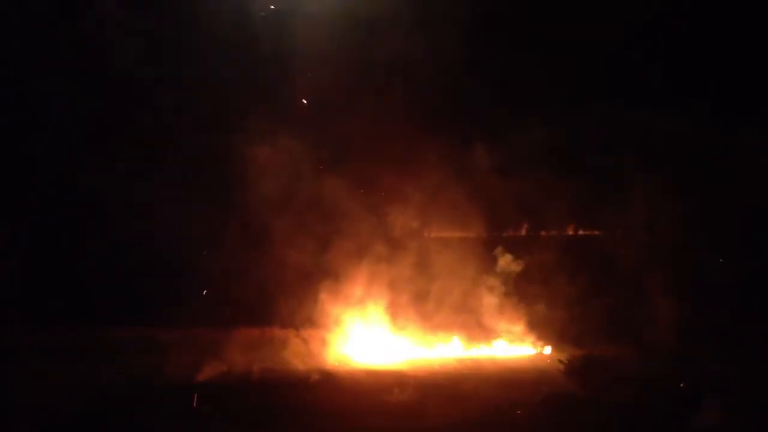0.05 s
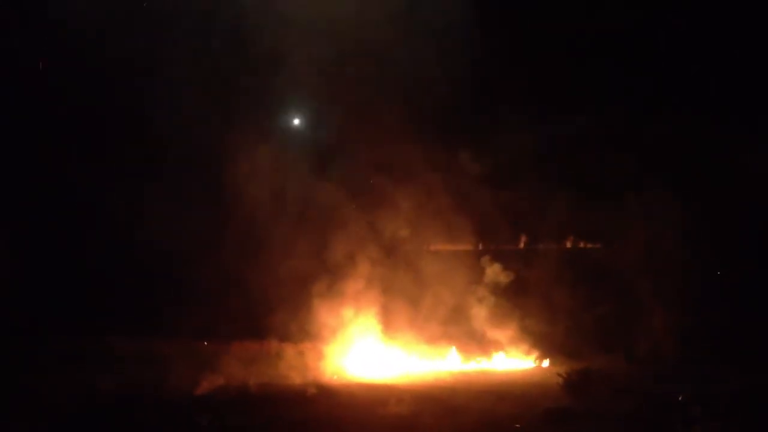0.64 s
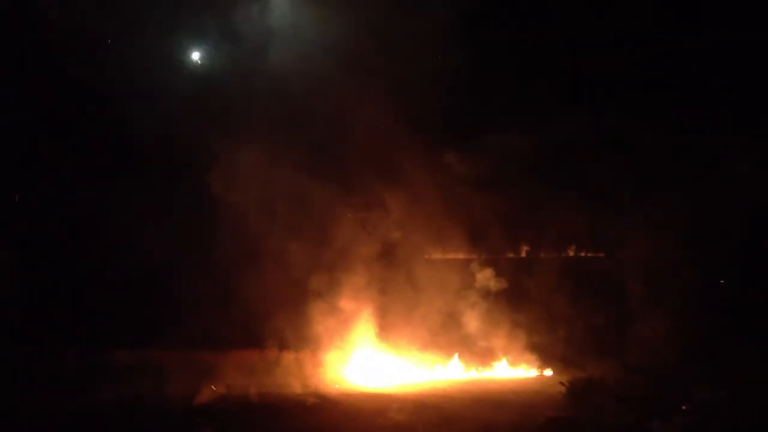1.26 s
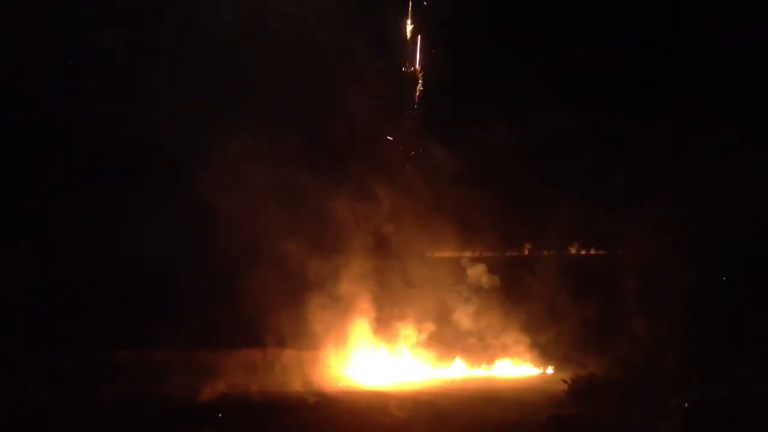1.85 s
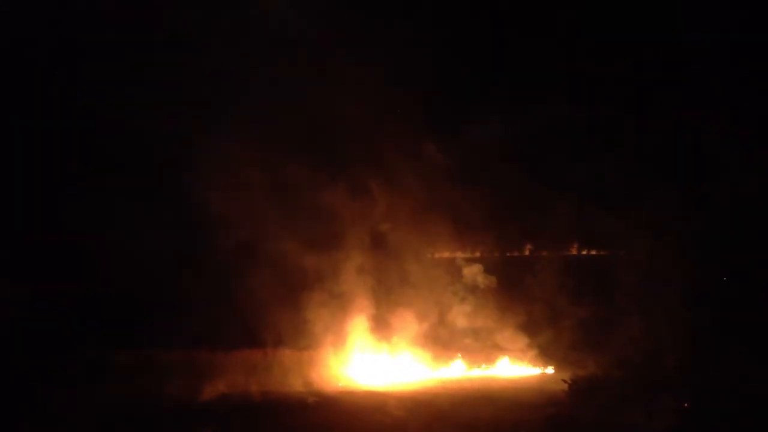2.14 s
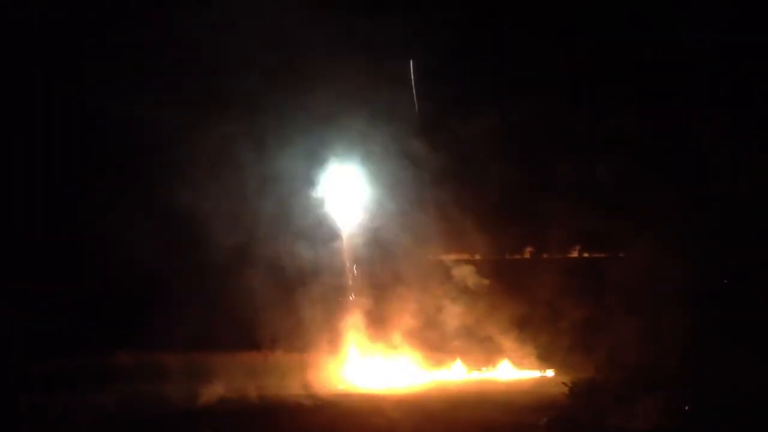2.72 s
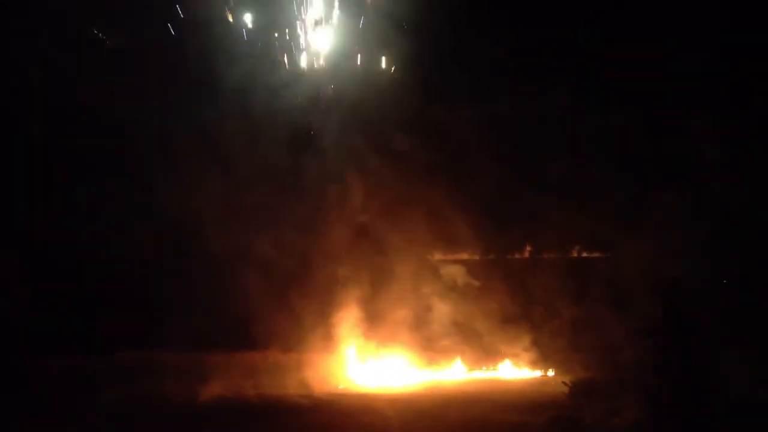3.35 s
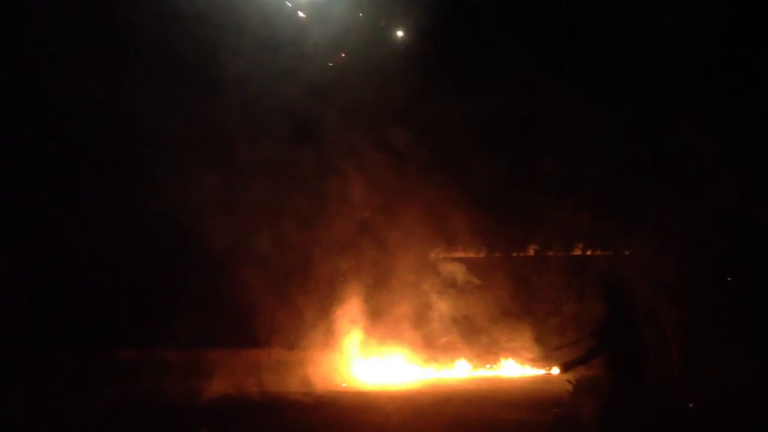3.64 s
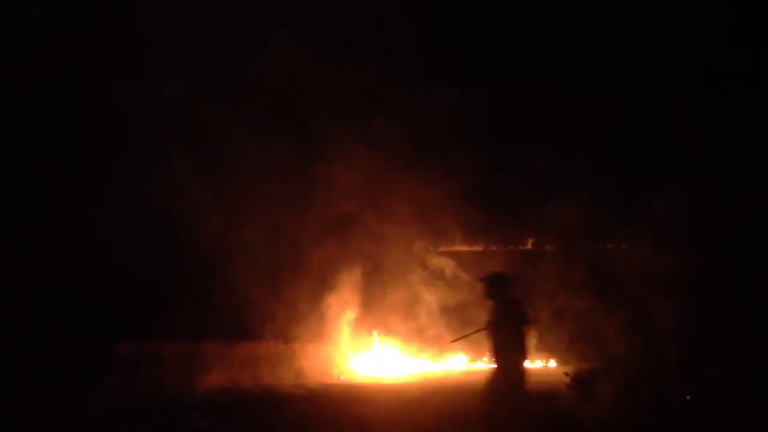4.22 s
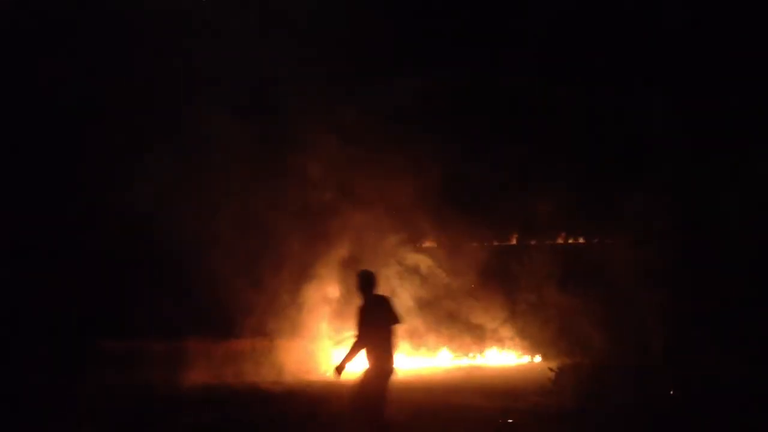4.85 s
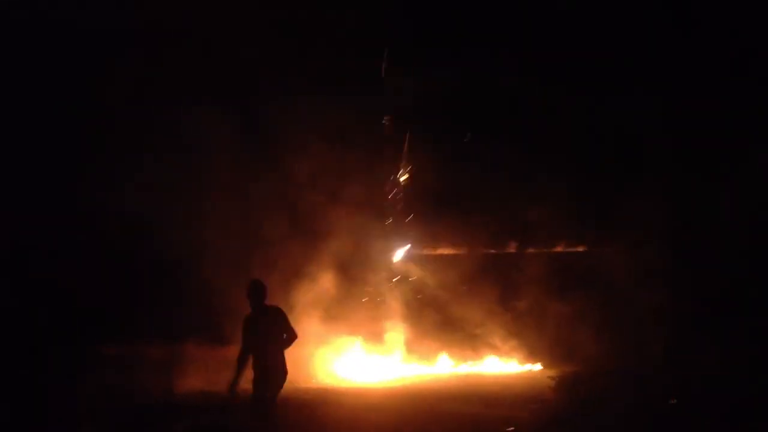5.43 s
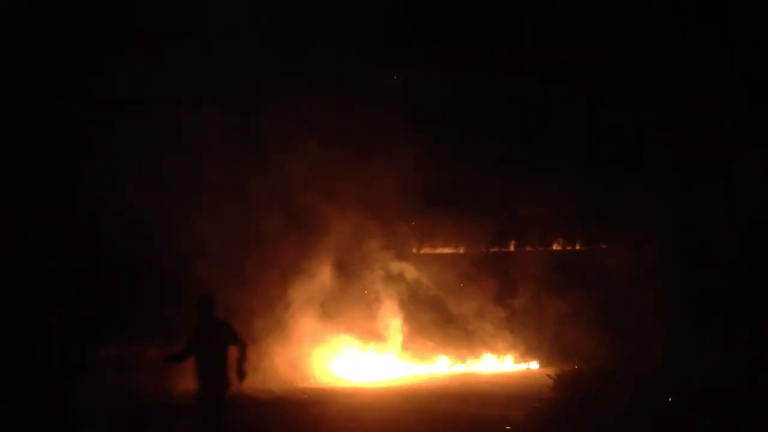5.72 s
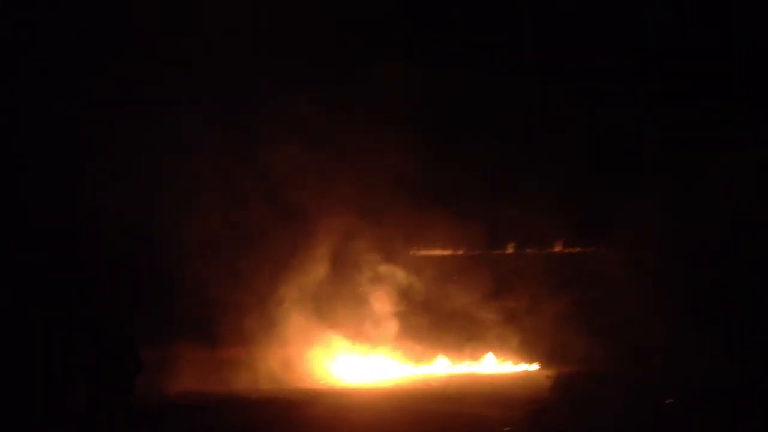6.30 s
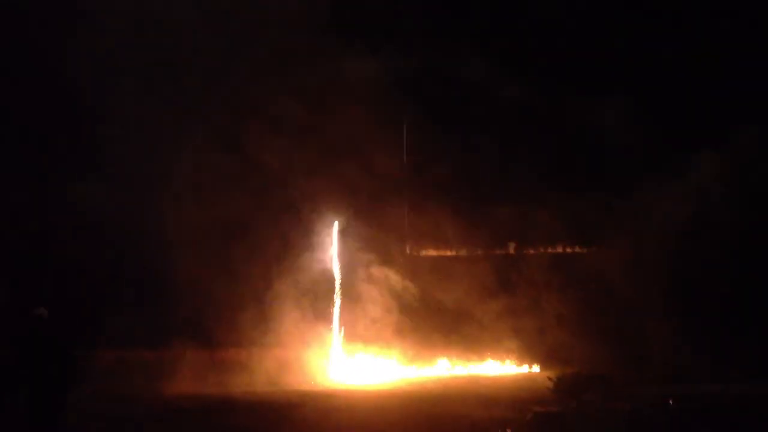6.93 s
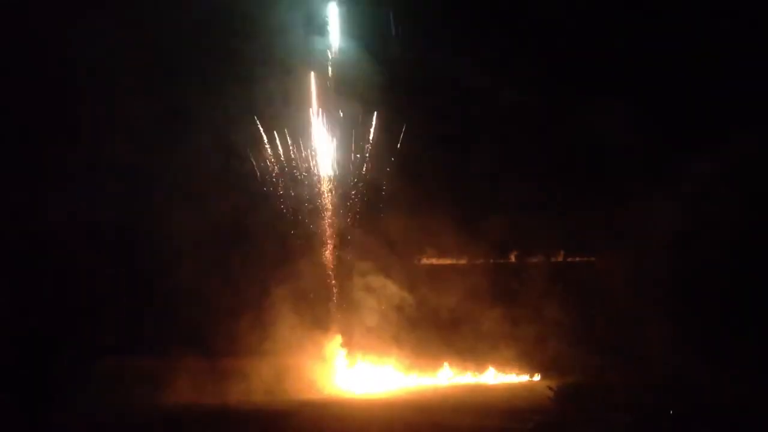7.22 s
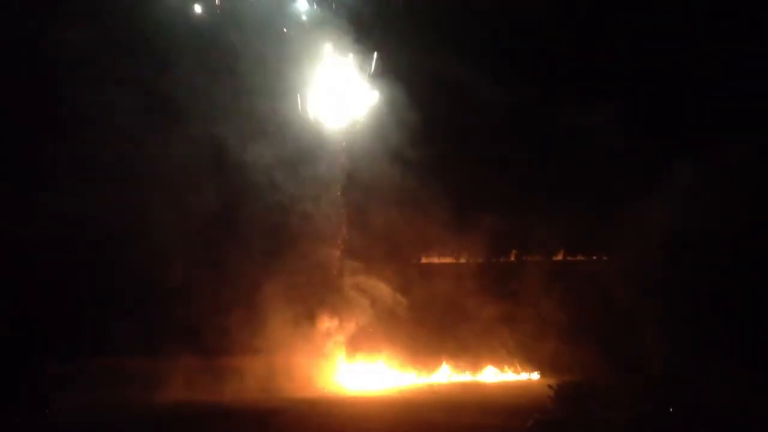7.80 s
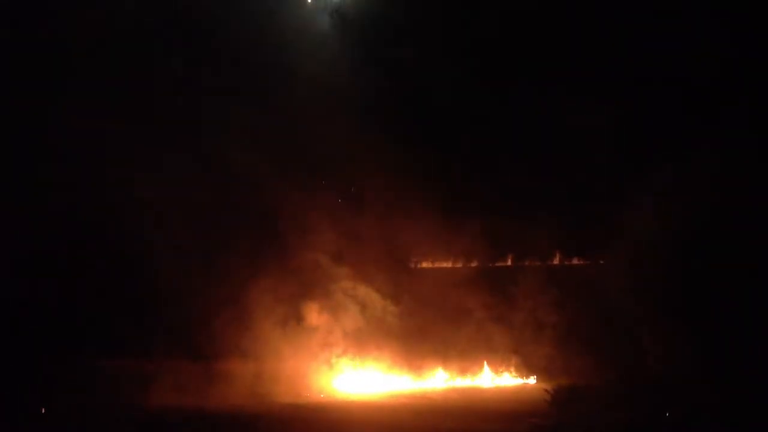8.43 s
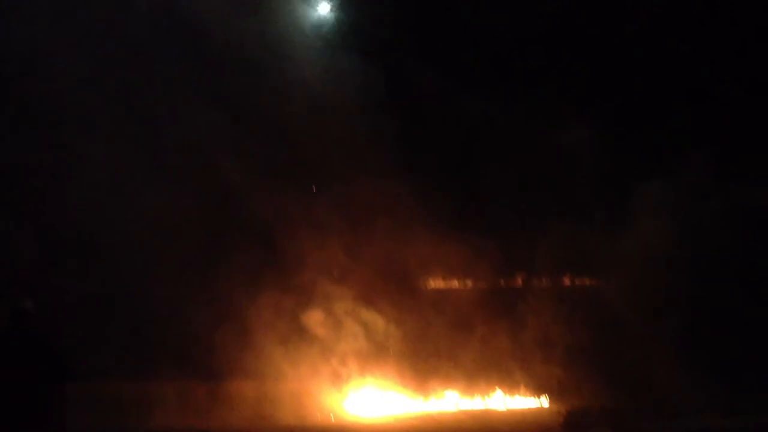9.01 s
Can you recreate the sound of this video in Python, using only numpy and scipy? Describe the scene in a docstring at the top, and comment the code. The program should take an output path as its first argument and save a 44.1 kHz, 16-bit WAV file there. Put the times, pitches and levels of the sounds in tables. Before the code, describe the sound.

Fireworks go off in a bonfire in an open field, heard from some tens of metres away. Powder briefly sputters and snaps, then shells burst with sharp bangs, often in pairs, while launch tubes crack and thump between them. The reports crowd into a quick cluster late on, followed by two loud bangs. Each leaves a long, darkening echo from the trees over a faint, low fire rumble.

```python
"""Fireworks cook off in a bonfire in a field at night, some tens of metres away.
The dying wash of a shell burst opens over a low murmur; powder flares, sputters and snaps from 0.5 s.
From 0.9 s shells burst, each a shock wave that the ground sends back once more; from 1.5 s tubes fire
with a crack and a thump. Reports crowd together near 7 s, and two loud shells follow near 8.5 s.
Throughout, bushes return a short rush and trees scatter the reports into a long, darkening wash."""
import sys
import numpy as np
from scipy import signal
from scipy.fft import rfft, irfft
from scipy.io import wavfile
from scipy.ndimage import uniform_filter1d

SR = 44100
rng = np.random.default_rng(int(sys.argv[2]) if len(sys.argv) > 2 else 0)


def master_out(mix):
    """Clip the mix to full scale and print it as 16-bit PCM to the path in sys.argv[1]."""
    frames = np.transpose(np.atleast_2d(mix))
    ceiling = np.clip(frames, -1, 1)
    pcm = np.round(ceiling * 32767).astype(np.int16)
    wavfile.write(sys.argv[1], SR, pcm)


N = 403956
TIME_S = np.arange(N) / SR
EVENT_MS = 1000 * np.arange(4096) / SR  # time axis of one report or spark


def undb(db):
    """Decibels to gain."""
    return 10 ** (np.asarray(db) / 20)


def unit_rms(x):
    """Scale to rms 1."""
    return x / np.sqrt(np.mean(x ** 2))


def curve_at(points, hz):
    """Interpolate (frequency [Hz], value) points on a log-frequency axis."""
    points_hz, values = np.transpose(points)
    return np.interp(np.log(hz + 1e-9), np.log(points_hz), values)


def cut(x, hz, kind="low", order=1):
    """Butterworth low-pass or high-pass."""
    return signal.sosfilt(signal.butter(order, hz, kind, fs=SR, output="sos"), x)


def colour(x, spectrum, size=2048):
    """Minimum-phase filter through (frequency [Hz], gain [dB]) points."""
    hz = np.arange(size // 2 + 1) * SR / size
    cepstrum = irfft(np.log(undb(curve_at(spectrum, hz))))
    cepstrum[1:size // 2] *= 2
    cepstrum[size // 2 + 1:] = 0
    impulse = irfft(np.exp(rfft(cepstrum)))
    return signal.fftconvolve(x, impulse)[:len(x)]


def noise(spectrum):
    """Coloured noise, rms 1."""
    return unit_rms(colour(rng.standard_normal(N), spectrum))


def flutter(rate_hz, spread_db):
    """Smooth random gain about 0 dB."""
    step = int(SR / rate_hz)
    stairs = np.repeat(rng.standard_normal(N // step + 1), step)
    return undb(spread_db * unit_rms(uniform_filter1d(stairs, step)[:N]))


def add(out, time_s, sound):
    """Mix a sound in; skip it if it starts outside the scene."""
    start = int(time_s * SR)
    if 0 <= start < N:
        out[start:start + len(sound)] += sound[:N - start]


# Background spectrum: (frequency [Hz], gain [dB])
MURMUR_SPECTRUM = [(25, -18), (80, -10), (170, -2), (350, -2), (700, -10), (1200, -25.5), (2500, -28.5),
                   (6000, -35.5), (14000, -44.5)]


def night_murmur(level_db=-64.5):
    """Low, far murmur of the fire and the open country."""
    return undb(level_db) * flutter(rate_hz=4, spread_db=0.7) * noise(MURMUR_SPECTRUM)


# Tree echoes of shells and of tubes: (frequency [Hz], gain [dB])
SHELL_WASH_SPECTRUM = [(40, -23.5), (90, -16), (180, -2), (340, -4.5), (560, -5), (800, -8.5), (1050, -12),
                       (1900, -17), (2600, -22.5), (4300, -30.5), (7400, -25.5), (14000, -43.5)]
TUBE_WASH_SPECTRUM = [(40, -29.5), (90, 3.5), (170, 13), (350, 0.5), (700, -0.5), (1200, -6), (1900, -7.5),
                      (3000, -17), (4500, -21), (7400, -18), (14000, -21.5)]
# Tree-line decay: (frequency [Hz], T60 [s])
TREE_T60 = [(100, 2.8), (250, 4.82), (700, 3.43), (1800, 2.29), (4000, 1.69), (8000, 0.79)]


def tree_wash(events, spectrum, gain_db, build_s, early_boost, early_s, clump_db, patchy_db):
    """Countless echoes from grass and trees build up, arrive in clumps and lose their treble first."""
    fft_size = 2 ** 19
    clumped = rng.standard_normal(N) * flutter(260, clump_db)
    echo_bins = rfft(unit_rms(colour(clumped, spectrum)), fft_size)
    hz = np.arange(len(echo_bins)) * SR / fft_size
    onsets_s, strengths = np.transpose(events)
    grid_s = TIME_S[::64]
    age_s = np.maximum(grid_s - onsets_s[:, None], 0)
    early = 1 + early_boost * np.exp(-age_s / early_s)
    arrivals = strengths[:, None] ** 2 * (1 - np.exp(-age_s / build_s)) * early
    centres_hz = np.geomspace(100, 9000, 10)
    out = np.zeros(N)
    for centre_hz, weights in zip(centres_hz, np.eye(len(centres_hz))):
        band = irfft(echo_bins * curve_at(np.c_[centres_hz, weights], hz))[:N]
        decay = undb(-60 * age_s / curve_at(TREE_T60, centre_hz))
        power = np.sum(arrivals * decay ** 2, axis=0)
        envelope = np.interp(TIME_S, grid_s, np.sqrt(power))
        out += band * envelope * flutter(22, patchy_db)
    return undb(gain_db) * out


# Bush echoes of tube cracks and of shell shocks: (frequency [Hz], gain [dB])
CRACK_ECHO_SPECTRUM = [(200, -15), (700, 2.5), (1200, 4.5), (1900, 6), (3000, -3), (4000, -15), (7500, -11),
                       (14000, -42)]
SHOCK_ECHO_SPECTRUM = [(80, -29.5), (200, -7.5), (330, 1), (500, -5), (800, -12.5), (2000, -36),
                       (14000, -51)]


def bush_echo(events, spectrum, gain_db, lag_s, build_s, fade_s, clump_db):
    """The nearest bushes throw each report back as a short, rough rush."""
    age_s = np.arange(SR) / SR
    envelope = (1 - np.exp(-age_s / build_s)) * np.exp(-age_s / fade_s)
    power = np.zeros(N)
    for time_s, strength in events:
        add(power, time_s + lag_s, (strength * envelope) ** 2)
    return undb(gain_db) * np.sqrt(power) * flutter(90, clump_db) * noise(spectrum)


# Powder flares: (time of full burn [s], hold [s], level [dB])
POWDER_FLARES = [(0.602, 0.11, -45.5), (1.534, 0.14, -45.5), (1.894, .14, -45), (5.058, .08, -60),
                 (5.274, 0.032, -53.5)]


def powder_burn(rise_db_per_s=126, fall_db_per_s=70.5):
    """Burn envelope: each flare catches fast, holds and dies away."""
    burn = np.zeros(N)
    for time_s, hold_s, level_db in POWDER_FLARES:
        rise_db = rise_db_per_s * np.maximum(time_s - TIME_S, 0)
        fall_db = fall_db_per_s * np.maximum(TIME_S - time_s - hold_s, 0)
        burn += undb(level_db - rise_db - fall_db)
    return burn


# Grains, gas and sparks: (frequency [Hz], gain [dB])
POWDER_SPECTRUM = [(60, -24.5), (170, 13.5), (400, 0.5), (600, 11.5), (950, -2), (1300, 2.5), (1550, -2.5),
                   (1900, -2), (2800, -12), (4200, -15), (5500, -12.5), (7600, -9.5), (14000, -34.5)]


def powder_sputter(burn, grains_per_s=1900, scatter_db=3.2, hiss_gain=0.78):
    """Powder grains pop in dense, uneven swarms over a hiss of gas."""
    sizes = undb(scatter_db * np.minimum(rng.exponential(size=N), 4.5))
    signs = rng.choice([-1, 1], N)
    pops = unit_rms(sizes * signs * (rng.random(N) < grains_per_s / SR))
    hiss = hiss_gain * rng.standard_normal(N)
    swarms = (pops + hiss) * flutter(rate_hz=190, spread_db=2.8)
    return burn * unit_rms(colour(swarms, POWDER_SPECTRUM))


# Loudest sparks: (time [s], level [dB])
LOUD_SPARKS = [(0.4884, -41), (0.5224, -40), (0.5457, -37), (.7225, -32.5), (0.8005, -38.5), (0.8265, -41),
               (.842, -35.5), (2.085, -36), (2.239, -42.5)]


def sparks(burn, rate_per_s=24, over_burn_db=1.5, range_db=5, decay_ms=2.14):
    """Sparks snap out singly: a few loud ones, and lesser ones at random while powder burns."""
    snap = np.exp(-EVENT_MS / decay_ms)
    envelope = np.zeros(N)
    for time_s, level_db in LOUD_SPARKS:
        add(envelope, time_s, undb(level_db) * snap)
    for slot, (jitter, size) in enumerate(rng.random((int(rate_per_s * N / SR), 2))):
        time_s = (slot + jitter) / rate_per_s
        gain = burn[int(time_s * SR)] * undb(over_burn_db + range_db * size ** 2)
        add(envelope, time_s, gain * snap)
    return envelope * noise(POWDER_SPECTRUM)


# Tube crack: (frequency [Hz], gain [dB])
CRACK_SPECTRUM = [(100, -14), (400, -11.5), (800, -0.5), (1150, 4), (1550, 0.5), (1900, 4), (2500, -6.5),
                  (3000, -10.5), (4200, -7), (5500, -12), (7600, -15), (14000, -21)]
# Tube shots, relative levels: (time [s], thump [dB], crack [dB], treble shelf [dB])
TUBE_SHOTS = [(1.531, -8.5, -43, 11), (1.6149, -5, -35, 1.5), (2.6591, -3, -17.5, -4),
              (2.8197, -3, -23, 0.5), (4.222, -19, -42.5, -10.5), (5.1949, -5.5, -43, 17),
              (5.295, -4, -34, 1), (6.6608, -30, -43, 15.5), (6.91, -12, -26.5, -6.5),
              (6.9669, -11.5, -27, -6.5), (7.024, -7.5, -35, -3.5), (7.4348, -10.5, -32, -11),
              (8.931, -21.5, -30, -10)]


def tube_launches(thump_gain_db=-1.16, crack_gain_db=9.5, muzzle_hz=170, crack_ms=1.97, spit_db=-21):
    """Gas leaves a tube: a sharp front and a ragged crack, then a slow push and suction."""
    base_push_ms, doubling_db = 0.79, 7
    front = 6 * (EVENT_MS == 0)
    out = np.zeros(N)
    for time_s, thump_db, crack_db, treble_db in TUBE_SHOTS:
        # a slow-burning charge cracks less, and pushes and spits longer
        push_ms = base_push_ms * 2 ** ((thump_db - crack_db) / doubling_db)
        push = (1 - EVENT_MS / push_ms) * np.exp(-EVENT_MS / push_ms)
        thump = undb(thump_db + thump_gain_db) * cut(push, muzzle_hz, order=2)
        spit = undb(spit_db) * np.exp(-EVENT_MS / (4 * push_ms))
        gas = rng.standard_normal(len(EVENT_MS)) * (np.exp(-EVENT_MS / crack_ms) + spit)
        crack = colour(front + gas, CRACK_SPECTRUM)
        crack += (undb(treble_db) - 1) * cut(crack, hz=3200, kind="high")
        add(out, time_s, thump + undb(crack_db + crack_gain_db) * crack)
    return out


def shock(age_ms, length_ms, rise_ms=0.08):
    """N-shaped pressure wave: a steep front, a ramp into suction, a quick return."""
    progress = age_ms / length_ms
    front = 1 - np.exp(-np.maximum(age_ms, 0) / rise_ms)
    ramp = 1 - 1.316 * progress
    closing = (1 - np.tanh((progress - 1) / 0.02)) / 2
    return front * ramp * closing


def shock_pair(age_ms, length_ms, rebound_gain=0.35, rebound_ms=1.61):
    """A shock, then a weaker, shorter one as the fireball rebounds."""
    return shock(age_ms, length_ms) + rebound_gain * shock(age_ms - rebound_ms, 0.8 * length_ms)


# Shock path over the field: (frequency [Hz], gain [dB])
FIELD_RESPONSE = [(100, 5), (200, 2.5), (310, -2.5), (400, 3.5), (560, 3), (950, 0.5), (1350, 0),
                  (1900, -0.5), (2800, -9.5), (4500, -8), (7500, 7), (14000, -3)]
# Shells: (time [s], relative level [dB], shock length [ms], ground echo lag [ms])
SHELL_BURSTS = [(-.19, 2.5, 1.4, 3.3), (0.8952, -3, 1.05, 3.22), (1.2426, -2, 0.97, 3.04),
                (1.258, -2.5, 1.62, 3.53), (3.3074, -1, 1.58, 3.4), (3.438, -2.5, 1.515, 3.51),
                (4.2972, -2, 1.69, 3.52), (4.5396, -5, 0.86, 3.55), (6.6847, -2, 1.62, 3),
                (7.0562, -2.5, 1.54, 3.42), (7.1566, -27.5, 1.6, 1.95), (7.881, -43, 2.0, 3.3),
                (8.3685, -1, 1.47, 3.47), (8.6091, -2, 1.64, 3.58), (8.7629, -22, 2.1, 3.9)]


def shell_bursts(ground_gain=0.85, ground_hz=800, ground_stretch=1.795, tear_db=-35, tear_ms=4):
    """Each shell tears its casing and sends a shock pair; soft ground returns it duller and longer."""
    out = np.zeros(N)
    for time_s, level_db, length_ms, lag_ms in SHELL_BURSTS:
        direct = shock_pair(EVENT_MS, length_ms)
        reflected = cut(shock_pair(EVENT_MS - lag_ms, ground_stretch * length_ms), ground_hz)
        grit = unit_rms(cut(rng.standard_normal(len(EVENT_MS)), hz=2900))
        tear = undb(tear_db) * grit * np.exp(-EVENT_MS / tear_ms)
        add(out, time_s, undb(level_db) * (direct + ground_gain * reflected + tear))
    return colour(out, FIELD_RESPONSE)


def microphone_bass(x, corner_hz=168, q=1.84, rolloff_hz=115):
    """Resonant high-pass: steep pressure steps set the bass corner ringing briefly."""
    omega = 2 * np.pi * corner_hz
    b, a = signal.bilinear([1, 0, 0], [1, omega / q, omega ** 2], SR)
    return cut(signal.lfilter(b, a, x), rolloff_hz, "high", order=2)


def scene(crack_weight_db=15):
    """Direct reports, tree and bush echoes in proportion to their strength, powder and murmur; mono."""
    reports = microphone_bass(shell_bursts() + tube_launches())
    # echo sources: (time [s], strength [linear])
    shells = [(time_s, undb(level_db)) for time_s, level_db, _, _ in SHELL_BURSTS]
    cracks = [(time_s, undb(crack_db)) for time_s, _, crack_db, _ in TUBE_SHOTS]
    tubes = [(time_s, np.hypot(undb(thump_db), undb(crack_db + crack_weight_db)))
             for time_s, thump_db, crack_db, _ in TUBE_SHOTS]
    trees = tree_wash(shells, SHELL_WASH_SPECTRUM, gain_db=-42.5, build_s=0.0025,
                      early_boost=1.0, early_s=0.027, clump_db=0.5, patchy_db=1.94)
    trees += tree_wash(tubes, TUBE_WASH_SPECTRUM, gain_db=-47, build_s=0.014,
                       early_boost=0.46, early_s=0.059, clump_db=1.0, patchy_db=0)
    bushes = bush_echo(cracks, CRACK_ECHO_SPECTRUM, gain_db=-20, lag_s=0.018,
                       build_s=0.025, fade_s=0.066, clump_db=3.5)
    bushes += bush_echo(shells, SHOCK_ECHO_SPECTRUM, gain_db=-39, lag_s=0.0054,
                        build_s=0.003, fade_s=0.12, clump_db=4)
    burn = powder_burn()
    powder = powder_sputter(burn) + sparks(burn)
    return (reports + trees + bushes + powder + night_murmur())[None]


def record(dry, ceiling=0.66, skew=0.55, treble_hz=8300, leak_db=-17, hiss_db=-82, top_hz=15400):
    """A phone squashes the loudest peaks, passes little treble and adds a faint hiss."""
    squashed = ceiling * np.tanh(dry / ceiling)
    # overload pushes the input off centre; it settles back with a deep thud
    offset = cut(squashed ** 2, hz=62, order=2)
    thud = cut(offset, hz=20, kind="high")
    body = cut(squashed - skew * thud, treble_hz, order=12)
    leak = undb(leak_db) * cut(squashed, treble_hz, "high", order=2)
    hiss = undb(hiss_db) * rng.standard_normal(dry.shape)
    band_limit = signal.ellip(8, 0.2, 70, top_hz, fs=SR, output="sos")
    return signal.sosfilt(band_limit, body + leak + hiss)


dry = scene()
out = record(dry)
master_out(out)
```